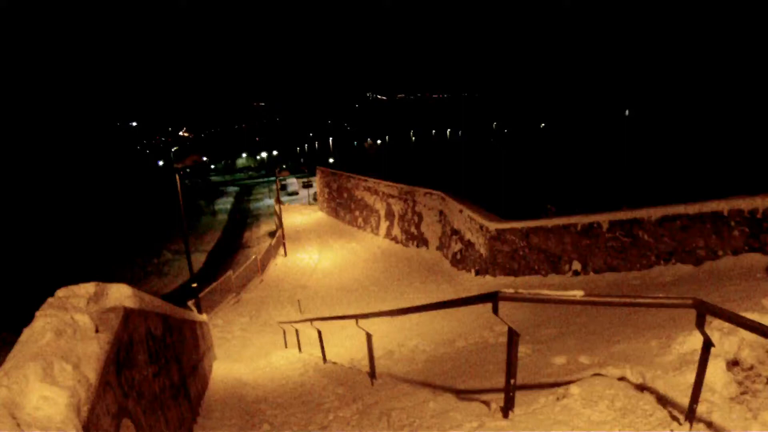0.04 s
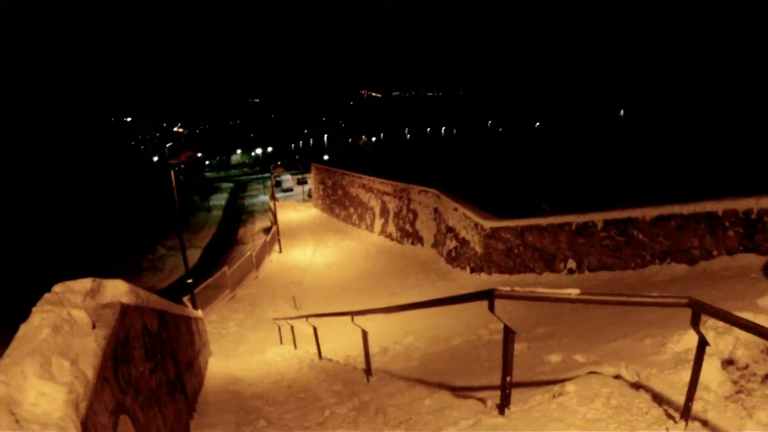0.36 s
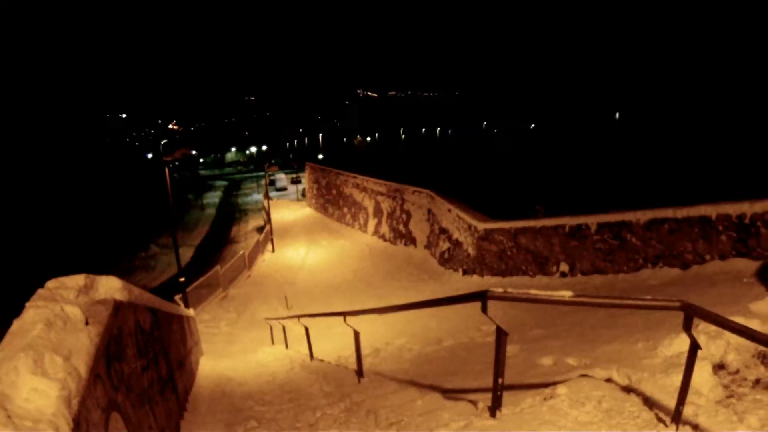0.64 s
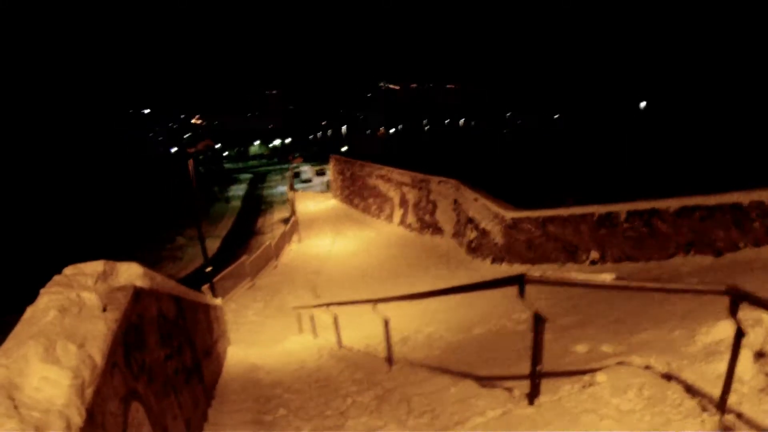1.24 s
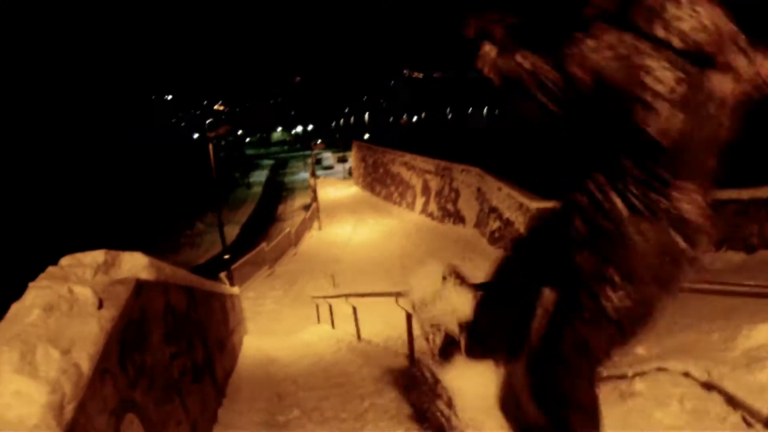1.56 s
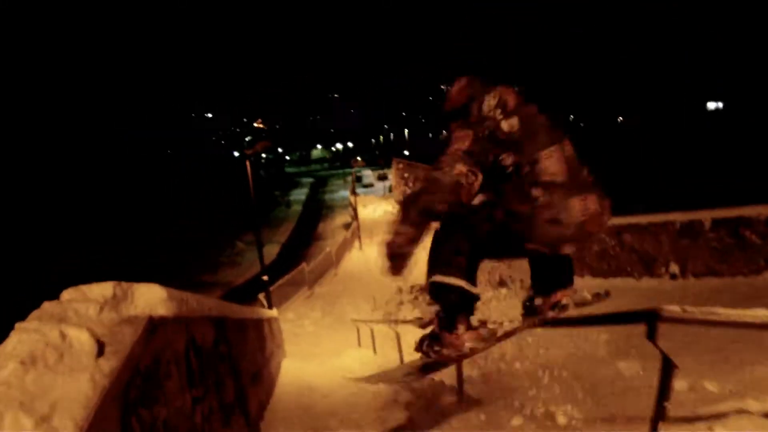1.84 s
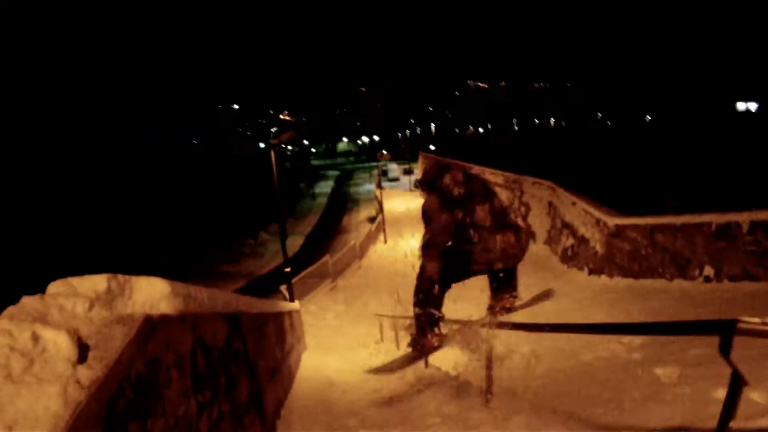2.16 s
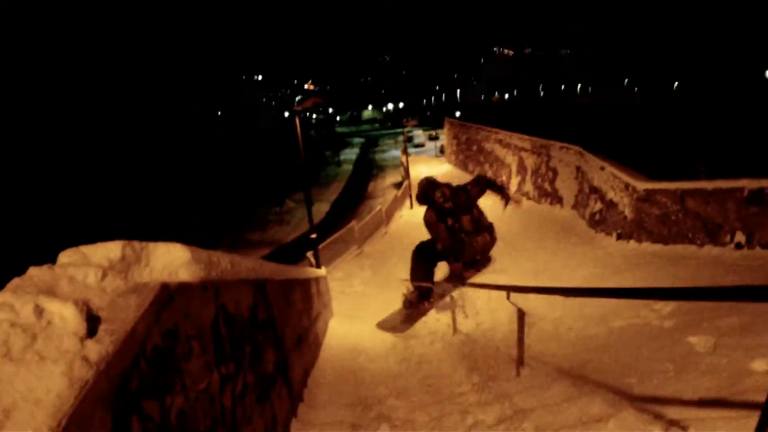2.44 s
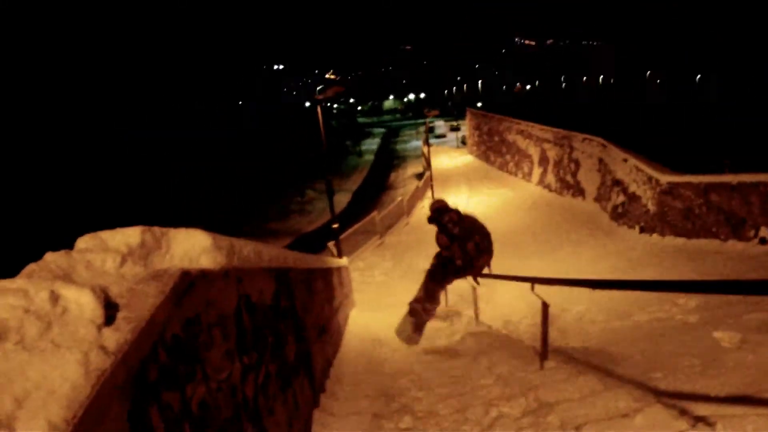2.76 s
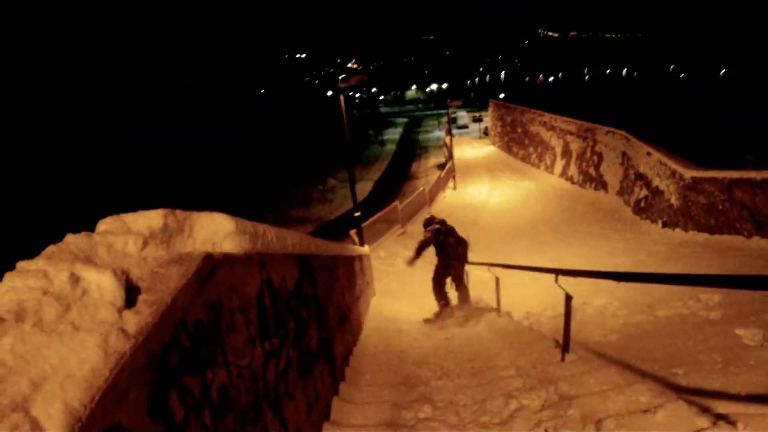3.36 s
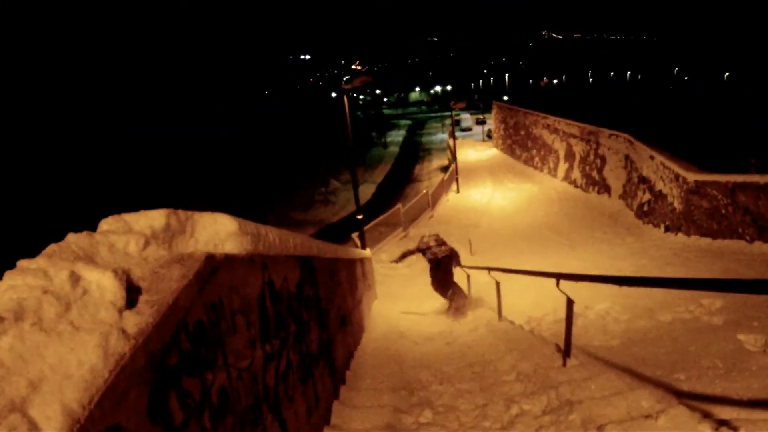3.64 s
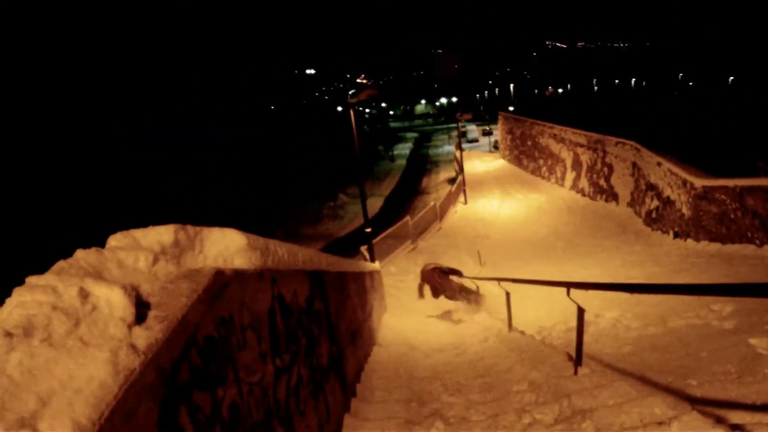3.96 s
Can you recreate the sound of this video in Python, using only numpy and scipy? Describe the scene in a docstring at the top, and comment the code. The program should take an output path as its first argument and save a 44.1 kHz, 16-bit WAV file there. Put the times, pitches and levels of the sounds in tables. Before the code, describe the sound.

A snowboard glides softly over snow, with faint hiss and light wind rumbling on the microphone. It squeaks past at 1.5 seconds and takes off with a scrape and jacket swish near 1.8. Around 2.3 it briefly grinds a steel rail, which rings faintly. Loud clacks and rattling follow from 2.7 to 3.3 over a faint low hum, then the board crunches and skids through snow until 4 seconds.

```python
"""A snow slope at night, close to a steel handrail; wind rumbles on a small camera's stereo microphone.
A snowboarder glides past with a squeak, pops off the snow with a swish of the jacket and grinds the rail.
From there the sound is in slow motion: slices are heard twice, the channels slip apart and a thump is
drawn out into a low hum. The board clacks off the rail's end and skids out. Its resonances colour each
contact, and the camera, holding its samples at a low rate, mirrors everything into the treble."""
import sys
import numpy as np
from scipy import signal
from scipy.fft import rfft, irfft
from scipy.io import wavfile
from scipy.ndimage import uniform_filter1d

SR = 44100
rng = np.random.default_rng(int(sys.argv[2]) if len(sys.argv) > 2 else 0)


def inscribe(sig):
    """Save sig as 16-bit PCM at rate SR to the path in sys.argv[1].

    A 1-D sig is mono; a 2-D sig holds one channel per row.
    Samples are clipped to [-1, 1] before scaling.
    """
    pcm = np.round(np.clip(np.atleast_2d(sig).T, -1, 1) * 32767)
    wavfile.write(sys.argv[1], SR, pcm.astype(np.int16))


N = 176400
T = np.arange(N) / SR
HZ = np.fft.rfftfreq(N, 1 / SR) + 1e-3


def undb(db):
    """Decibels to gain."""
    return 10 ** (np.asarray(db) / 20)


def unit(x):
    """Scale to rms 1."""
    return x / np.sqrt(np.mean(x ** 2))


def swell(curve):
    """Gain along (time_s, level_db) points, silent outside them."""
    s, db = np.array(curve).T
    return undb(np.interp(T, s, db)) * (T >= s[0]) * (T <= s[-1])


def colour(x, points):
    """Shape a sound by (frequency_hz, gain_db) points, at rms 1."""
    hz, db = np.array(points).T
    return unit(irfft(rfft(x) * undb(np.interp(np.log(HZ), np.log(hz), db)), N))


def resonance(f, hz, width):
    """Response of one resonance at frequencies f."""
    return 1 / (1 + 1j * (f * f - hz * hz) / (f * width))


# spectrum of the background hiss: frequency_hz, gain_db
HISS_COLOUR = [(150, 10), (400, 6.5), (900, 1), (2200, -0.5), (3200, -4), (4200, -3), (5500, -9.5)]

def hiss(shared_db=-63, channel_db=-69.5):
    """A faint steady hiss in the centre, with white noise of its own in each channel."""
    shared = undb(shared_db) * colour(rng.standard_normal(N), HISS_COLOUR)
    return shared + undb(channel_db) * rng.standard_normal((2, N))


# gusts at the microphone: time_s, level_db
GUSTS = [(0, -59.5), (.7, -61), (1.0, -55), (1.4, -54), (1.7, -57), (2.05, -55.5), (2.4, -56), (2.55, -61),
         (2.8, -59), (3.15, -57.5), (3.5, -53.5), (4, -62)]
# spectrum of their rumble: frequency_hz, gain_db
WIND_COLOUR = [(12, -3), (28, 2), (60, -6.5), (100, -11.5), (200, -21.5), (400, -29), (1000, -62)]

def wind(port_db=-23):
    """Wind rumbles right on the microphone, a little differently at each of its two ports."""
    shared, left, right = (colour(rng.standard_normal(N), WIND_COLOUR) for _ in range(3))
    return (shared + undb(port_db) * np.array([left, right])) * swell(GUSTS)


# soft thuds under the ride: start_s, pitch_hz, decay_s, level_db
THUDS = [(0.437, 49, 0.016, -38), (1.334, 34.3, 0.018, -40.5), (1.994, 60, 0.015, -44.5),
         (2.29, 150, 0.01, -53.5), (2.369, 89, 0.01, -52.5)]

def thuds():
    """Low thuds, each gone within a few cycles."""
    out = np.zeros(N)
    for start, hz, decay, db in THUDS:
        t = np.maximum(T - start, 0)
        out += undb(db) * np.sin(2 * np.pi * hz * t) * np.exp(-(t / decay) ** 2 / 2)
    return out


# hum of the drawn-out thump: time_s, level_db
HUM = [(2.68, -91), (2.73, -57), (2.9, -65), (3.1, -61), (3.28, -60.5), (3.36, -87)]

def low_hum(pitch_hz=130.2, width_hz=34):
    """A thump drawn out by the slow motion into a narrow low hum."""
    band = resonance(HZ, pitch_hz, width_hz) ** 2
    return unit(irfft(rfft(rng.standard_normal(N)) * band, N)) * swell(HUM)


# the jacket during the jump: time_s, level_db
SWISH = [(1.79, -48), (1.85, -59.5), (1.9, -53), (1.93, -53), (1.97, -78)]
# spectrum of the cloth: frequency_hz, gain_db
SWISH_COLOUR = [(1500, -12), (3700, 3), (4900, -2), (5600, 2.5)]

def jacket():
    """The rider's jacket swishes brightly in the air."""
    return colour(rng.standard_normal(N), SWISH_COLOUR) * swell(SWISH)


# squeak on the approach: time_s, pitch_hz, level_db
SQUEAK = [(1.432, 2174, -57), (1.445, 2647, -56.5), (1.461, 3400, -49), (1.469, 3340, -51),
          (1.478, 2310, -50), (1.488, 2250, -54)]

def squeak(jitter_depth=0.0354, octave_db=-13):
    """A brief rough squeak with its octave rises and falls as the rider passes the microphone."""
    s, hz, db = np.array(SQUEAK).T
    jitter = unit(uniform_filter1d(rng.standard_normal(N), size=30))
    pitch = np.interp(T, s, hz) * (1 + jitter_depth * jitter)
    phase = 2 * np.pi * np.cumsum(pitch) / SR
    return unit(np.sin(phase) + undb(octave_db) * np.sin(2 * phase)) * swell(np.c_[s, db])


# resonances of the board: pitch_hz, width_hz, rail_db, clack_db, snow_db, skid_db
BOARD_MODES = [(558, 170, -33, -22, -50, -6), (825, 93, -9.5, -11.5, -5, -5),
               (1139, 147, -14, -30, -10.5, -8.5), (1403, 98, -3.5, -21.5, -6, -7.5),
               (1710, 120, -3.5, -7, 3, -3), (2052, 152, 2.5, -4, 7, 3.5), (2124, 112, 4.5, 5, -26.5, 1.5),
               (2450, 234, -4, -8, -2.5, -8), (2677, 136, -5.5, -5, -0.5, -16),
               (3093, 180, -6, -2.5, 1.5, -15), (3496, 128, 2, -2.5, -2.5, -13),
               (3750, 475, -20, -10, -8, -24), (5120, 520, -10, -13, -22, -24)]

def board(contact):
    """The board's response: each kind of contact weights the same modes, summed in alternating sign."""
    column = ["rail", "clack", "snow", "skid"].index(contact)
    return sum((-1) ** k * undb(levels[column]) * resonance(HZ, hz, width)
               for k, (hz, width, *levels) in enumerate(BOARD_MODES))


def friction(grains_per_s=5000, scatter_db=2.5):
    """Dense stick-slip clicks of uneven size."""
    hit = rng.random(N) < grains_per_s / SR
    return hit * rng.choice([-1, 1], N) * undb(scatter_db * rng.standard_normal(N))


def rub(contact):
    """Steady friction heard through the board."""
    return unit(irfft(rfft(friction()) * board(contact), N))


# gliding on snow towards the rail: time_s, level_db
GLIDE = [(0, -104), (.7, -70.5), (.95, -61), (1.1, -57), (1.35, -60), (1.48, -57), (1.6, -64.5),
         (1.75, -64), (1.81, -59.5), (1.95, -61.5), (2.2, -68), (2.38, -63.5), (2.5, -66), (2.7, -75)]
# spectrum of the glide: frequency_hz, gain_db
GLIDE_COLOUR = [(300, -16), (900, -8.5), (1200, -5), (1550, -13.5), (1900, -3.5), (2200, 1.5),
                (2700, -11.5), (3400, -7), (4300, -19), (5300, -12)]
# the board chattering after the rail: time_s, level_db
CHATTER = [(2.4, -72), (2.45, -72), (2.6, -77), (2.72, -65), (2.735, -54.5), (2.85, -48.5), (2.93, -49),
           (3.05, -53), (3.09, -58), (3.2, -56), (3.27, -60), (3.35, -74)]
# the run-out over snow: time_s, level_db
RUNOUT = [(3.2, -70), (3.29, -50), (3.33, -55.5), (3.365, -53), (3.395, -60), (3.41, -51.5), (3.47, -58.5),
          (3.54, -51), (3.62, -48), (3.66, -44.5), (3.74, -44), (3.8, -46.5), (3.9, -53), (4, -56)]

def sliding(flutter_db=2, flutter_per_s=60):
    """The board glides, chatters and runs out; uneven pressure makes the level flutter."""
    step = int(SR / flutter_per_s)
    pressure = np.repeat(rng.standard_normal(N // step + 1), step)
    flutter = undb(flutter_db * unit(uniform_filter1d(pressure, step)[:N]))
    glide = colour(friction(), GLIDE_COLOUR) * swell(GLIDE)
    return flutter * (glide + rub("clack") * swell(CHATTER) + rub("snow") * swell(RUNOUT))


# light ticks of the bindings: start_s, level_db
TICKS = [(3.1077, -41.5), (3.130, -41), (3.1804, -38), (3.242, -43)]

def bindings(grit_gain=0.28, grit_s=0.0011):
    """Single sharp knocks with a little grit, heard through the board."""
    body = board("clack")
    drive = np.zeros(N)
    for start, db in TICKS:
        i = int(start * SR)
        drive[i] += undb(db)
        drive[i:] += undb(db) * grit_gain * rng.standard_normal(N - i) * np.exp(-T[:N - i] / grit_s)
    return irfft(rfft(drive) * body, N) / np.abs(irfft(body, N)).max()


# modes of the handrail: pitch_hz, half_peak_db, t60_s
RAIL_MODES = [(1733, -70, 0.64), (2191, -69, .4), (3480, -70.5, 0.92), (3480, -66, 0.96)]

def handrail(on_s=2.27, off_s=2.375):
    """The steel tube is driven while the board grinds on it, then rings out."""
    drive = rng.standard_normal(N) * (T > on_s) * (T < off_s)
    out = np.zeros(N)
    for hz, half_peak_db, t60 in RAIL_MODES:
        mode = np.sin(2 * np.pi * hz * T) * np.exp(-np.log(1000) * T / t60)
        ring = signal.fftconvolve(drive, mode)[:N]
        out += 2 * undb(half_peak_db) * ring / np.abs(ring).max()
    return out


def bursts(table, contact, contact_gain=0.87, contact_width_hz=150):
    """Short bursts of friction, each with its own contact resonance; some are heard twice."""
    attack_s, release_s, tail_s, tail_db = 0.0017, 0.0023, 0.018, -25
    out, size = np.zeros(2 * N), 8192
    t = np.arange(size) / SR - .02  # room for the attack
    f = np.fft.rfftfreq(size, 1 / SR) + 1e-3
    grit = rub(contact)
    for k, (start, length, db, hz, repeat) in enumerate(table):
        emphasis = 1 + contact_gain * resonance(f, hz, contact_width_hz)
        grains = irfft(rfft(grit[k * size:(k + 1) * size]) * emphasis)
        after = np.maximum(t - length, 0)
        decay = np.exp(-after / release_s) + undb(tail_db) * np.exp(-after / tail_s)
        envelope = np.exp(np.minimum(t, 0) / attack_s) * decay
        burst = unit(grains * envelope) * np.sqrt(np.mean(envelope ** 2)) * undb(db)
        for onset in [start, start + repeat] if repeat else [start]:
            i = int((onset + t[0]) * SR)
            out[i:i + size] += burst
    return out[:N]


# All five tables: start_s, length_s, level_db, contact_hz, repeat_after_s (0 = heard once)
# soft snow crumbs crushed on the approach
CRUMBS = [(.252, 0.0031, -62, 3470, 0), (.435, 0.0027, -56.5, 3440, 0.0038), (.538, 0.0046, -66, 2540, 0),
          (.571, 0.021, -64, 1650, 0.0054), (1.065, 0.011, -66, 2140, 0.0031),
          (1.122, 0.0085, -69, 2210, 0), (1.265, .02, -68, 2130, 0), (1.322, 0.0066, -64, 4600, 0.0075),
          (1.535, 0.0056, -60.5, 2090, 0)]
# scrapes of the edge at take-off and along the rail
SCRAPES = [(1.757, 0.0018, -48.5, 4020, 0.013), (1.772, 0.018, -52, 3570, 0.00079),
           (2.237, 0.013, -53, 2480, 0.001), (2.252, 0.043, -58, 1960, 0.0097),
           (2.294, 0.0034, -51.5, 3280, 0), (2.302, 0.049, -54, 2000, 0.00023),
           (2.346, 0.014, -57, 3340, 0)]
# hard clacks off the rail's end
CLACKS = [(2.738, .003, -46, 2840, 0.0018), (2.764, 0.0051, -39.5, 2840, 0.0059),
          (2.781, 0.0024, -52, 3200, 0.014), (2.807, 0.0097, -38, 3280, 0.006),
          (2.813, 0.0032, -46, 2970, 0.0044), (2.8202, 0.0066, -23.5, 3020, 0), (2.871, .004, -58, 3400, 0),
          (2.8865, 0.0026, -32.5, 3150, 0.0038), (2.965, 0.0052, -51, 3130, 0.044),
          (2.9755, 0.011, -35.5, 3320, .053), (2.980, 0.0039, -29.5, 3300, .053),
          (3.001, 0.005, -52, 3300, .053)]
# the edge biting into packed snow
CRUNCHES = [(3.426, 0.047, -52.5, 1430, 0.063), (3.439, 0.0075, -40, 2180, .067),
            (3.556, 0.013, -44.5, 2240, 0.041), (3.642, 0.0076, -40.5, 2140, 0),
            (3.663, 0.011, -41, 2470, 0.0059), (3.6895, 0.0055, -33, 1700, 0.0059),
            (3.702, 0.0048, -35.5, 2040, 0.013), (3.722, 0.028, -46, 2200, 0.0076),
            (3.747, .008, -36.5, 2080, 0.0034), (3.7605, .014, -28.5, 1870, 0.066)]
# the base slapping or skidding flat on the snow
SKIDS = [(.436, 0.017, -55.5, 1990, 0), (1.7565, 0.0022, -49, 1130, 0.0028),
         (3.9255, .017, -37, 1160, 0.066)]

def board_contacts():
    """In the foreground, edge and base strike snow and steel, each time sounding the board's modes."""
    return (bursts(CRUMBS, "rail") + bursts(SCRAPES, "rail") + bursts(CLACKS, "clack")
            + bursts(CRUNCHES, "snow") + bursts(SKIDS, "skid"))


def scene(start_s=.096):
    """From the camera's spot: a moment of silence, then the ride in the centre over wind and hiss."""
    ride = board_contacts() + bindings() + sliding() + jacket() + handrail() + squeak()
    return (ride + wind() + low_hum() + thuds() + hiss()) * (T > start_s)


# slow-motion slips between the channels: start_s, left_lag_s
SLIPS = [(2.42, .00026), (3.39, .00075), (3.735, -.00082)]

def record(dry, hold_hz=12000, band_hz=5650, top_hz=15500):
    """The camera's held samples mirror the sound into the treble; the channels slip; the top is cut."""
    narrow = irfft(rfft(dry) / np.sqrt(1 + (HZ / band_hz) ** 50), N)
    mirrored = narrow * (1 + 2 * np.cos(2 * np.pi * hold_hz * T))
    held_spectrum = rfft(mirrored) * np.sinc(HZ / hold_hz)  # holding dulls the treble
    stereo = irfft(held_spectrum, N)
    for start, lag in SLIPS:
        delay = np.exp(-1j * np.pi * HZ * lag * np.array([[1], [-1]]))  # half the lag each way
        stereo = np.where(T >= start, irfft(held_spectrum * delay, N), stereo)
    lowpass = signal.ellip(10, .2, 80, top_hz, fs=SR, output="sos")
    return signal.sosfilt(lowpass, stereo)


dry = scene()
out = record(dry)
inscribe(out)
```